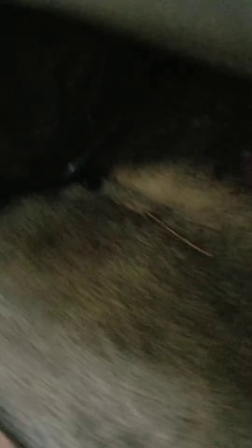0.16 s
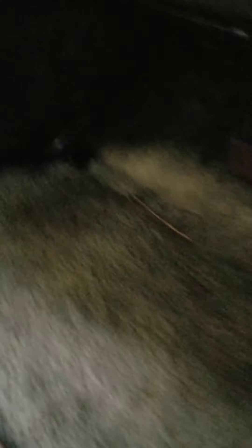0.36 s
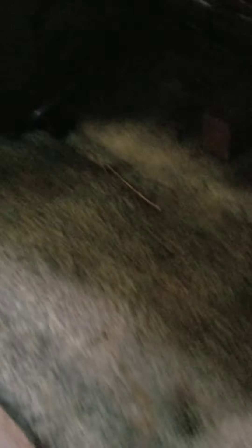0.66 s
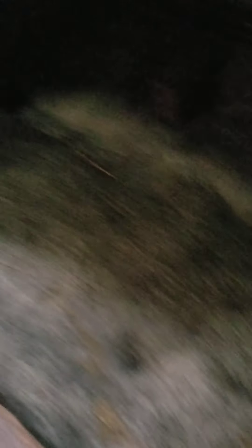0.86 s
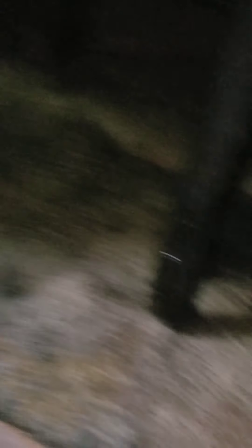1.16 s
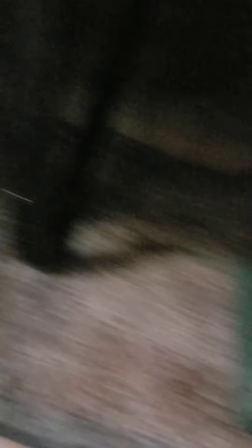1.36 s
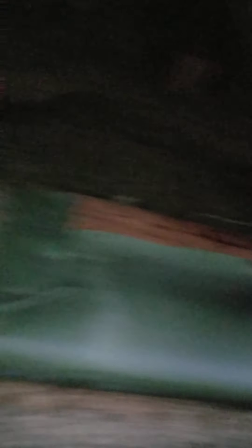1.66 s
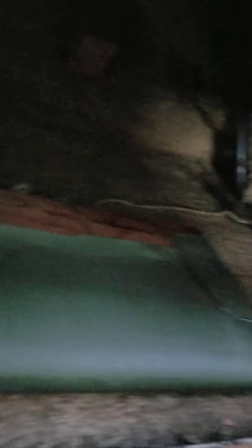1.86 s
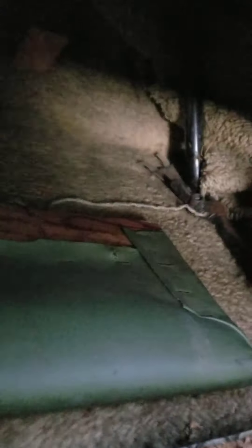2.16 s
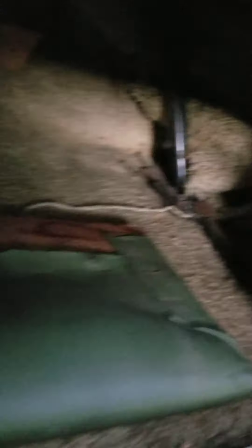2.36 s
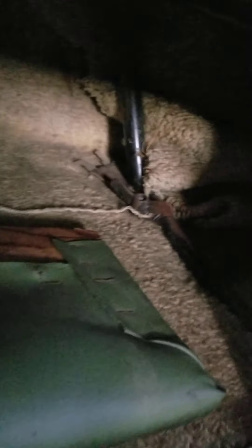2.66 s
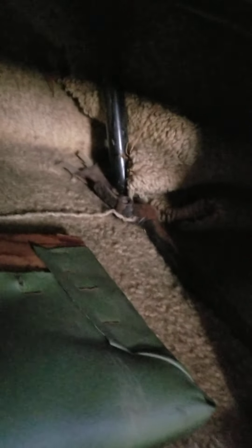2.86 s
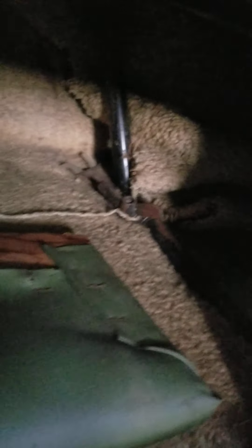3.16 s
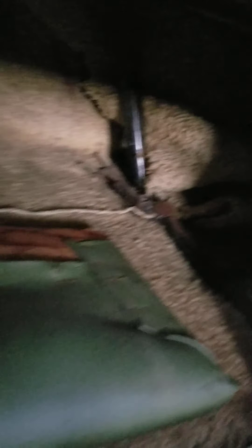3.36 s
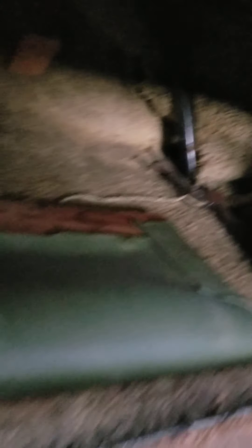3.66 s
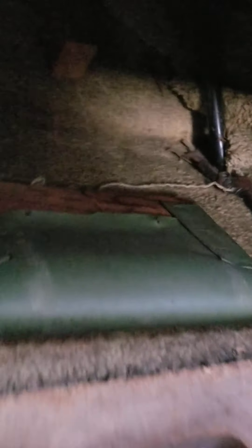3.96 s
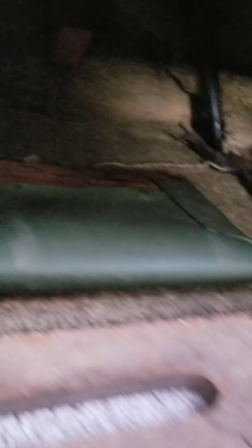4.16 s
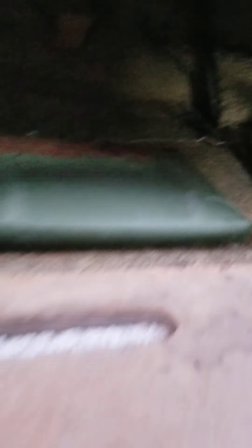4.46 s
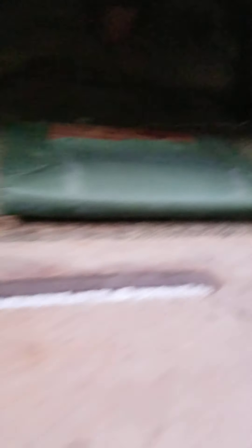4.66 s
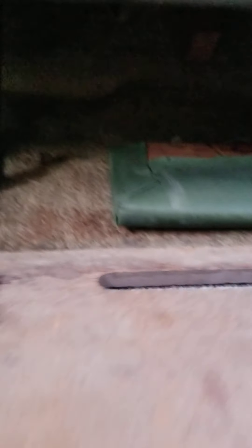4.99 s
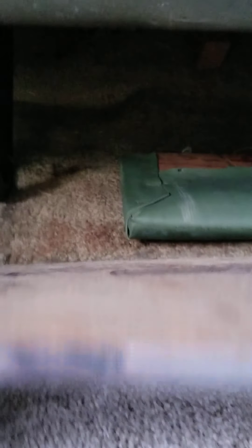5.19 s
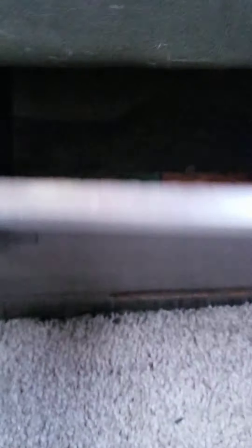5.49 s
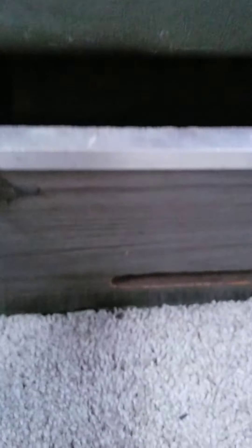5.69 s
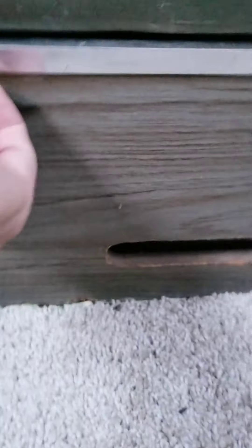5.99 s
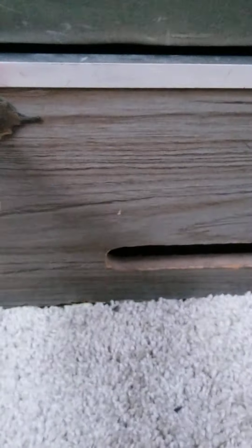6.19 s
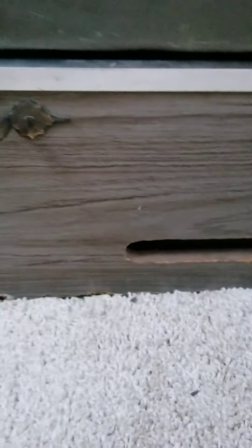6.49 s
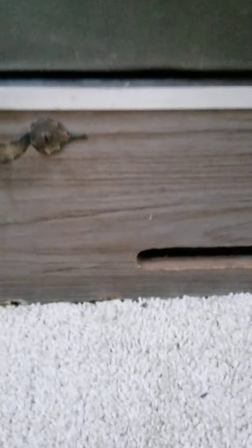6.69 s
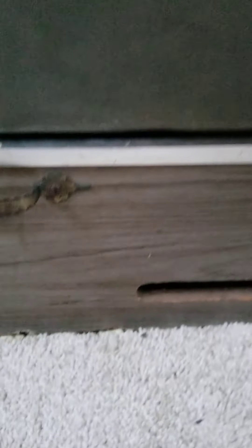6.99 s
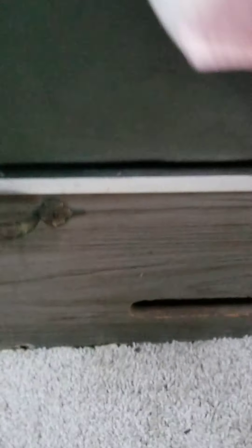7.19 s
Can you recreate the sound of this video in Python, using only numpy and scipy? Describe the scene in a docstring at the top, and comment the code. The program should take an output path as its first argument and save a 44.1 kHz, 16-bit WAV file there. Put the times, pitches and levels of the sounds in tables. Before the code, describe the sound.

An air-cooled engine idles throughout, heard inside a van with the microphone close under the lifted rear bench. Its uneven firings make a low, booming throb that wavers slightly in speed, with rhythmic sheet-metal clatter, a steady fan rush and faint valve ticks. A few light metallic clinks ring in the first second and a half. Just before 3 seconds, the wooden seat gives two quick, hollow clicks to the left. From about 3.5 seconds the microphone draws back and the rumble eases a little while the tinny clatter comes forward. At about 5.8 seconds the seat drops shut with a loud, sharp knock and a short boom, followed by a tiny hinge squeak and a small latch click. The engine continues, quieter and muffled. A sleeve brushes the upholstery very faintly here and there, and a soft handling bump comes at about 7.3 seconds.

```python
"""Inside a van, at the lifted rear bench, the microphone close to an idling air-cooled flat-four.
Uneven firings boom in the cabin and clatter through the panels; valves tick and clink, the fan rushes.
The wooden seat clicks as it is held and a sleeve brushes the upholstery. The microphone draws back,
the seat drops shut with a knock and muffles the engine; a soft handling bump comes at the end."""
import sys
import numpy as np
from scipy import signal
from scipy.fft import rfft, irfft
from scipy.io import wavfile

SR = 44100
rng = np.random.default_rng(int(sys.argv[2]) if len(sys.argv) > 2 else 0)


def inscribe(sig):
    """Save sig as 16-bit PCM at rate SR to the path in sys.argv[1].

    A 1-D sig is mono; a 2-D sig holds one channel per row.
    Samples are clipped to [-1, 1] before scaling.
    """
    pcm = np.round(np.clip(np.atleast_2d(sig).T, -1, 1) * 32767)
    wavfile.write(sys.argv[1], SR, pcm.astype(np.int16))


N = 323694
T = np.arange(N) / SR
AGE = T[:SR // 2]  # seconds since a blow
HZ = np.maximum(np.arange(2049) * SR / 4096, 1)
SHUT_S = 5.834


# Each row: one cylinder's exhaust place in the cycle (0-1), exhaust level in dB, knock place (0-1),
# then its thud, clatter and duct levels in dB. Levels in the tables are relative.
CYLINDERS = [(.135, -10, .132, -2, 0, -10), (0.363, -5, .385, -1, -2.5, -1),
             (0.633, -4, .63, -5.5, -4, -10.5), (.873, -0.23, .893, -2.5, 0, -5.5)]
# Each row: cabin air mode in Hz, level in dB, t60 in seconds, polarity at the microphone.
CABIN_MODES = [(45, -17.5, 0.22, 1), (77.15, -21, 0.42, -1), (98.2, -25.5, 0.26, 1),
               (105.85, -17.5, 0.22, -1), (128.64, -25.5, 0.43, 1), (175.4, -24, 0.08, 1)]
# Each row, here and in every colour: frequency in Hz, spectral level in dB.
RUMBLE_COLOUR = [(20, -41.5), (35, -32.5), (50, 6.5), (80, 8.5), (120, 3), (160, -6), (250, -7.5),
                 (330, -15), (500, -69.5)]
def boom():
    """Unequal exhaust pulses ring the cabin air, whose modes beat into a throb over a steady rumble."""
    place, exhaust_db, *_ = np.transpose(CYLINDERS)
    pulses = strokes(place, exhaust_db, scatter_db=1.3, jitter_s=.0004)
    ring = sum(np.sign(polarity) * undb(db) * decay(t60) * np.cos(2 * np.pi * hz * AGE)
               for hz, db, t60, polarity in CABIN_MODES)
    muffler_hz, leak_hz = 210, 7
    ring = signal.sosfilt(signal.butter(4, muffler_hz, fs=SR, output="sos"), ring)
    ring = signal.sosfilt(signal.butter(1, leak_hz, "high", fs=SR, output="sos"), ring)
    throb = through(np.r_[pulses[-SR:], pulses], ring)[SR:]  # already ringing at the start
    return throb * np.minimum(T / .0051, 1) + noise(undb(-30), shape(RUMBLE_COLOUR))


# Each row: mode of the bay's steel floor in Hz, level in dB, t60 in seconds.
FLOOR_MODES = [(264.9, -5, 0.13), (401.1, -2, 0.18), (426.7, -4.5, 0.22), (456.2, 1.5, 0.12),
               (508.4, -8.5, 0.26), (573, -1, 0.085), (631, -9, 0.22)]
THUD_COLOUR = [(100, -15), (170, 6.5), (300, -6.5), (480, 10.5), (650, -15), (900, -34), (1500, -34.5),
               (4000, -71.5)]
def block():
    """Each firing thuds through the engine mounts into the floor pan."""
    _, _, place, thud_db, _, _ = np.transpose(CYLINDERS)
    blows = strokes(place, thud_db, scatter_db=1.2, jitter_s=.0009)
    thud = bursts(blows, rise_s=.0012, t60=.08)
    ring = struck_modes(FLOOR_MODES, place, thud_db, scatter_db=3, jitter_s=.0012)
    return noise(undb(-37) * thud, shape(THUD_COLOUR) + panel_db()) + undb(-33.5) * ring


# Each row: mode of the cooling shrouds in Hz, level in dB, t60 in seconds.
SHROUD_MODES = [(911.5, -1, .05), (954.5, 3, 0.094), (2060, -21.5, .14)]
CLATTER_COLOUR = [(300, -10.5), (600, -8), (820, 0.5), (1000, -6.5), (1150, -8), (1400, -12), (2100, -16.5),
                  (2600, -28), (5000, -38), (8000, -65.5)]
def shrouds():
    """With each firing the tin cooling shrouds clatter and rebound once."""
    _, _, place, _, clatter_db, _ = np.transpose(CYLINDERS)
    delay_cycles, rebound_cycles, rebound_db = .012, .052, -12
    place = np.r_[place, place + rebound_cycles] + delay_cycles
    clatter_db = np.r_[clatter_db, clatter_db + rebound_db]
    blows = strokes(place, clatter_db, scatter_db=0, jitter_s=.00087)
    clatter = bursts(blows, rise_s=.0019, t60=.06)
    ring = struck_modes(SHROUD_MODES, place, clatter_db, scatter_db=1, jitter_s=.0007)
    return noise(undb(-42.5) * clatter, shape(CLATTER_COLOUR) + panel_db()) + undb(-37) * ring


# Each row: duct mode in Hz, level in dB, t60 in seconds.
DUCT_MODES = [(784, 1, 0.16), (839.4, 2, 0.11)]
def duct():
    """The air duct rings mostly to one cylinder: an accent once a cycle."""
    _, _, place, _, _, duct_db = np.transpose(CYLINDERS)
    delay_cycles = .014
    ring = struck_modes(DUCT_MODES, place + delay_cycles, duct_db, scatter_db=1.5, jitter_s=.0007)
    return undb(-36.5) * ring


FAN_COLOUR = [(88, -22.5), (150, -8), (172, -11.5), (306, -13.5), (425, -10.5), (687, -17.5), (954, -23.5),
              (1070, -23), (1300, -30), (2060, -32), (2550, -42.5), (3750, -53), (4630, -54.5),
              (7350, -70.5), (15000, -60)]
def fan():
    """Cooling air rushes steadily behind the panels."""
    return noise(undb(-40), shape(FAN_COLOUR) + panel_db())


TAPPET_COLOUR = [(1000, -15), (2200, -7.5), (2800, 1.5), (3200, 0.5), (3750, -8.5), (4600, -3.5),
                 (5800, -8.5), (7500, -27.5), (15000, -46.5)]
def tappet():
    """One valve has too much play and ticks once a cycle; the whole valve train patters faintly."""
    loose = strokes([.128], 0, scatter_db=1.5, jitter_s=.00047)
    patter = strokes(np.arange(8) / 8, -5, scatter_db=1.5, jitter_s=.006)
    return noise(undb(-60) * bursts(loose + patter, rise_s=.00026, t60=.046), shape(TAPPET_COLOUR))


# Each row: place in the cycle (0-1), pitch in Hz, level in dB, t60 in seconds.
VALVE_CLINKS = [(.135, 3220, -63.5, 0.039), (.335, 3200, -64, 0.065), (.41, 4760, -66.5, 0.088),
                (.855, 3200, -67.5, 0.041)]
def valves():
    """Each part of the valve gear clinks at its own place in the cycle, now faintly, now clearly."""
    out, width_hz = 0, 300
    for place, hz, db, t60 in VALVE_CLINKS:
        clinks = bursts(strokes([place], db, scatter_db=1.5, jitter_s=.00044), rise_s=.0003, t60=t60)
        out = out + noise(clinks, -20 * np.log10(1 + ((HZ - hz) / width_hz) ** 2))
    return out


# Each row: start in seconds, pitch in Hz, bandwidth in Hz, level in dB, t60 in seconds.
LOUD_VALVE_CLINKS = [(.3507, 3200, 200, -61, 0.097), (.389, 3120, 201, -55, .12),
                     (.43, 3150, 199, -56, 0.089), (1.118, 2060, 60, -51, 0.32),
                     (1.1988, 4600, 300, -56, 0.063), (1.272, 2050, 59.5, -50, .26),
                     (2.883, 5800, 300, -57, .04), (4.955, 3400, 400, -54.5, 0.11)]
def loud_valve_clinks():
    """The loudest valve clinks ring briefly, each in a narrow band."""
    out = np.zeros((2, N))
    for s, hz, width_hz, db, t60 in LOUD_VALVE_CLINKS:
        band = signal.butter(1, [hz - width_hz / 2, hz + width_hz / 2], "band", fs=SR, output="sos")
        ring = signal.sosfilt(band, rng.standard_normal((2, len(AGE))))
        add(out, s, ring / ring.std() * undb(db) * decay(t60))
    return out


# Each row: start in seconds, crack level in dB, hollow wood level in dB, t60 in seconds.
SEAT_CONTACTS = [(5.8326, -18, -30, 0.039), (5.838, -17, -21.5, 0.05), (5.8495, -39, -18, 0.18)]
# Each row: mode of the box under the seat in Hz, level in dB, time to full swing in seconds.
BOX_MODES = [(124, -3.5, 0.021), (161.6, -13.5, 0.027), (209, -21, 0.025), (269, -33, 0.026),
             (535, -24.5, 0.011), (703, -42, .012)]
# One click: start in seconds, level in dB, t60 in seconds.
LATCH_CLICK = (6.0815, -38.5, .07)
CRACK_COLOUR = [(150, -44), (250, -18), (525, -5), (669, -23.5), (809, -10.5), (1330, -21.5), (2240, -15.5),
                (2400, -11.5), (4240, -17), (4630, -9.5), (5410, -27), (6210, -23), (7900, -38.5),
                (13500, -30), (15500, -40)]
SQUEAK_COLOUR = [(3000, -37.5), (5300, -12), (5750, 3), (6200, -11.5), (6800, -17), (7500, -32)]
LATCH_COLOUR = [(250, -13), (710, -17), (1200, -2), (1480, -10), (1610, -7), (2290, -3), (3680, -16),
                (6110, -18.5), (8130, -32), (15000, -29)]
def seat_landing():
    """The seat lands; the box under it swells into a boom, a hinge squeaks and the latch settles."""
    landing = knocks(SEAT_CONTACTS, shape(CRACK_COLOUR), tail_db=-25, tail_t60=.17)
    box = np.zeros(N)
    for hz, db, peak_s in BOX_MODES:
        swell = (AGE / peak_s * np.exp(1 - AGE / peak_s)) ** 1.6
        add(box, SHUT_S, undb(db) * swell * np.sin(2 * np.pi * hz * AGE))
    squeak = noise(undb(-48) * np.exp(-((T - 5.912) / .017) ** 2), shape(SQUEAK_COLOUR))
    latch_s, latch_db, latch_t60 = LATCH_CLICK
    latch = noise(undb(latch_db) * fade(latch_t60, latch_s), shape(LATCH_COLOUR))
    return pan(landing, left_db=-1) + box + squeak + latch


# Each row: frame mode in Hz, level in dB, t60 in seconds.
FRAME_MODES = [(980, 0, .15), (1730, -3, .08), (2380, -0.5, .1), (2640, 1, .1), (3200, -6, .1),
               (4360, 4, 0.077)]
def seat_frame():
    """The hardest contact rings the seat frame; each channel picks up the modes in its own phase."""
    out, hardest_s = np.zeros((2, N)), SEAT_CONTACTS[1][0]
    for hz, db, t60 in FRAME_MODES:
        phase = 2 * np.pi * (hz * AGE + rng.random((2, 1)))
        add(out, hardest_s, undb(db - 27) * decay(t60) * np.sin(phase))
    return out


# Each row: start in seconds, tick level in dB, hollow body level in dB, t60 in seconds.
CLICKS_AND_BUMP = [(2.8272, -31, -20, 0.014), (2.8312, -32, -15.5, 0.019), (2.9929, -28.5, -31.5, 0.0046),
                   (2.9984, -30.5, -24, 0.0093), (7.298, -60, -39.5, 0.069)]
# Each row: mode of the seat board in Hz, level in dB, t60 in seconds.
BOARD_MODES = [(350, -10, .035), (690, -1, .022)]
TICK_COLOUR = [(600, 11.5), (1200, -7.5), (2400, 0), (4000, -4.5), (5800, -12), (7500, -36.5), (10000, -27),
               (15000, -33)]
def clicks_and_bump():
    """To the left, wooden clicks and knocks, and a soft handling bump at the end; each rings hollow."""
    clicks = knocks(CLICKS_AND_BUMP, shape(TICK_COLOUR), tail_db=-29, tail_t60=.22)
    ring = sum(undb(db) * decay(t60) * np.sin(2 * np.pi * hz * AGE) for hz, db, t60 in BOARD_MODES)
    for s, _, body_db, _ in CLICKS_AND_BUMP:
        add(clicks, s, undb(body_db) * ring)
    return pan(clicks, left_db=6)


# Each row: middle of a brush in seconds, half length in seconds, level in dB.
SLEEVE_BRUSHES = [(.2, 0.22, -81.5), (.69, 0.059, -75), (1.05, .3, -79), (1.977, 0.17, -75),
                  (3.223, 0.14, -80), (3.837, 0.071, -74.5), (5.198, 0.2, -77), (5.352, .03, -67),
                  (5.52, 0.028, -64), (7.259, 0.094, -71.5)]
CLOTH_COLOUR = [(2000, -20), (5000, 0), (8000, -15.5), (10000, -11.5), (12500, -1.5), (14500, -8.5),
                (16000, -15)]
def sleeve():
    """Cloth rustles faintly throughout; each brush on the upholstery swells and fades."""
    swells = sum(undb(db) * np.exp(-((T - s) / half) ** 2) for s, half, db in SLEEVE_BRUSHES)
    return noise(undb(-82.5) + swells, shape(CLOTH_COLOUR))


WOOD_COLOUR = [(120, -29), (290, 6), (450, 1), (680, -4), (900, -16.5), (1500, -17), (4000, -54)]
def knocks(contacts, colour, tail_db, tail_t60):
    """Each contact is a bright crack and a hollow, woody body, with a short tail from the cabin."""
    crack = wood = 0
    for s, crack_db, wood_db, t60 in contacts:
        envelope = fade(t60, s) + undb(tail_db) * fade(tail_t60, s)
        crack += undb(crack_db) * envelope
        wood += undb(wood_db) * envelope
    return noise(crack, colour) + noise(wood, shape(WOOD_COLOUR))


# The idle hunts slowly. Each row: time in seconds, firings per second.
FIRING_RATE = [(0.0, 23.75), (0.41, 25.21), (0.82, 24.289), (1.22, 25.401), (1.63, 24.407), (2.07, 23.875),
               (2.54, 23.953), (3.38, 24.907), (4.11, 24.131), (4.52, 24.682), (5.21, 24.645),
               (5.71, 24.143), (6.12, 24.777), (7.34, 24.237)]
def strokes(places, db, scatter_db, jitter_s):
    """Impulses at set places in each four-firing cycle, scattered in size and time."""
    clock, step = np.linspace(0, T[-1], 4000, retstep=True)
    rate = np.interp(clock[1:], *np.transpose(FIRING_RATE))
    cycles = np.cumsum(np.r_[0, rate]) * step / 4
    due = np.arange(int(cycles[-1]) + 1)[:, None] + np.asarray(places)
    size, late = rng.standard_normal((2,) + due.shape)
    seconds = np.interp(due, cycles, clock, right=T[-1] + 1) + jitter_s * late
    at = (seconds * SR).astype(int)
    inside, out = (at >= 0) & (at < N), np.zeros(N)
    out[at[inside]] = undb(db + scatter_db * size)[inside]
    return out


def struck_modes(modes, places, db, scatter_db, jitter_s):
    """Every blow starts all modes, each a little differently; a second, sideways ring adds width."""
    mid, side, rise_s = 0, 0, .0015
    blows = np.array([strokes(places, db, 0, jitter_s) for _ in range(2)])
    struck = np.nonzero(blows)
    for hz, mode_db, t60 in modes:
        # a slow pole minus a fast one: the ring takes a moment to build
        turn = 2 * np.pi * hz / SR
        radii = np.exp(-np.log(1000) / t60 / SR), np.exp(-1 / rise_s / SR)
        slow, fast = ([1, -2 * r * np.cos(turn), r * r] for r in radii)
        push = blows + 1e-18
        push[struck] *= undb(mode_db + scatter_db * rng.standard_normal(1000)[:len(struck[0])])
        ring = signal.lfilter(np.sin(turn) * np.subtract(fast, slow), np.convolve(slow, fast), push)
        mid += ring[0]
        side += ring[1] * undb(np.interp(hz, *np.transpose(STEREO_WIDTH)))
    return np.array([mid + side, mid - side])


# Each row: centre in Hz, width in Hz, gain in dB.
PANEL_BANDS = [(416, 29, 2), (674, 51, -2.5), (823, 19, 5.5), (920, 30, 3), (1295, 150, -2.5),
               (2060, 54, 2.5), (3100, 220, -1), (4570, 1100, 7.5)]
def panel_db():
    """Resonances and dips of the sheet metal around the engine bay."""
    return sum(db / (1 + (2 * (HZ - hz) / width) ** 2) for hz, width, db in PANEL_BANDS)


# Each row: frequency in Hz, side minus mid level at the microphone in dB.
STEREO_WIDTH = [(60, -17), (130, -12.5), (220, -16.5), (380, -9), (700, -8), (1300, -1), (2400, -0.5),
                (5000, 0)]
def noise(envelope, db):
    """Stereo noise of the given envelope and colour; the treble arrives from all sides."""
    rings = response(db), response(db + shape(STEREO_WIDTH))
    mid, side = (through(envelope * rng.standard_normal(N), r) for r in rings)
    return np.array([mid + side, mid - side]) / np.linalg.norm(rings[0])


def bursts(pulses, rise_s, t60):
    """Each impulse swells and dies away."""
    return np.abs(through(pulses, decay(t60) * (1 - np.exp(-AGE / rise_s))))


def decay(t60):
    """Exponential fall from 1, by 60 dB in t60 seconds."""
    return np.exp(-np.log(1000) * AGE / t60)


def fade(t60, start):
    """Envelope with a sudden onset and exponential decay."""
    out = np.zeros(N)
    add(out, start, decay(t60))
    return out


def shape(points):
    """A (Hz, dB) table on the filter's frequency grid."""
    hz, db = np.transpose(points)
    return np.interp(np.log(HZ), np.log(hz), db)


def response(db):
    """Causal impulse response with the given gain curve."""
    cepstrum = irfft(np.log(undb(db)))
    half = len(cepstrum) // 2
    folded = np.r_[cepstrum[0], 2 * cepstrum[1:half], np.zeros(half)]
    return irfft(np.exp(rfft(folded)))


def through(x, ring):
    """Drive an impulse response with x."""
    return signal.oaconvolve(x, ring)[:len(x)]


def add(track, s, sound):
    """Mix a sound into a track at time s."""
    start = int(s * SR)
    track[..., start:start + sound.shape[-1]] += sound[..., :N - start]


def pan(x, left_db):
    """Set the left channel left_db above the right."""
    return x * undb([[left_db / 2], [-left_db / 2]])


def undb(db):
    """Decibels to gain."""
    return 10 ** (np.asarray(db) / 20)


# Each row: time in seconds, microphone position from 0 out in the cabin to 1 at the engine wall.
MIC_REACH = [(0, 0.99), (1.5, 0.75), (2.5, 1), (3.5, 1), (4.8, 0.35), (5.7, 0)]
# Each row: frequency in Hz, the engine's left minus right level in dB.
ENGINE_BALANCE = [(60, 1.38), (200, 0.3), (700, 2), (1300, -1.5), (2400, -2), (4400, -6), (15000, -0.5)]
def scene():
    """Close in, the floor pan grows and the shrouds recede; the shut seat shields the microphone."""
    seal_s = .075
    shut = np.clip((T - SHUT_S) / seal_s, 0, 1)
    reach = np.interp(T, *np.transpose(MIC_REACH))
    floor_db, shroud_db = -4.5 + 6 * reach, 1.5 - 3.5 * reach
    engine = (boom() * undb(.11 * floor_db - 7.4 * shut)
              + block() * undb(floor_db - 15 * shut)
              + shrouds() * undb(shroud_db - 10.9 * shut)
              + duct() * undb(.26 * floor_db - 11 * shut)
              + fan() * undb(.6 * floor_db - 8.1 * shut)
              + (tappet() + valves()) * undb(-8.5 * shut)
              + loud_valve_clinks())
    lean_db = shape(ENGINE_BALANCE) / 2
    engine = np.array([through(engine[0], response(lean_db)), through(engine[1], response(-lean_db))])
    return engine + clicks_and_bump() + seat_landing() + sleeve() + seat_frame()


def record(dry):
    """The phone's microphone channels clip at full scale and lose the top of the treble."""
    top_hz = 15850
    return signal.sosfilt(signal.ellip(10, .2, 80, top_hz, fs=SR, output="sos"), np.clip(dry, -1, 1))


dry = scene()
out = record(dry)
inscribe(out)
```